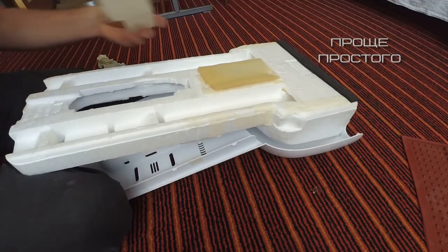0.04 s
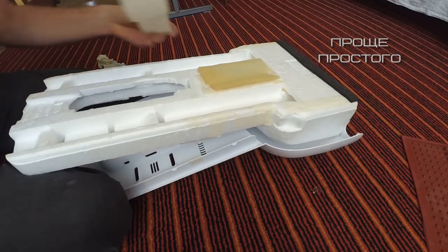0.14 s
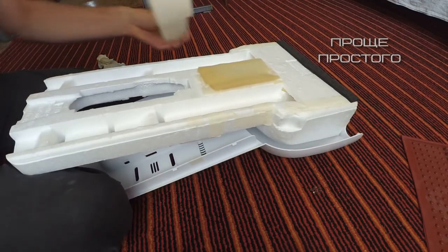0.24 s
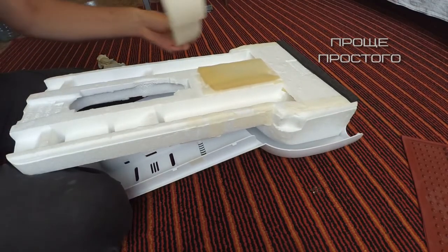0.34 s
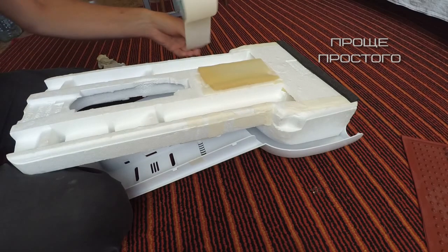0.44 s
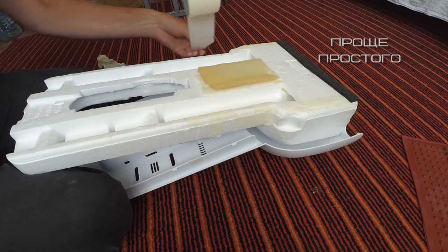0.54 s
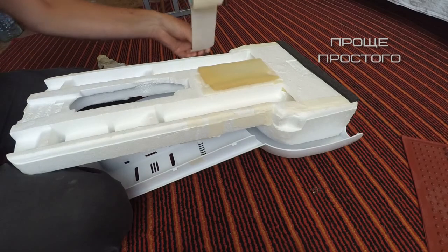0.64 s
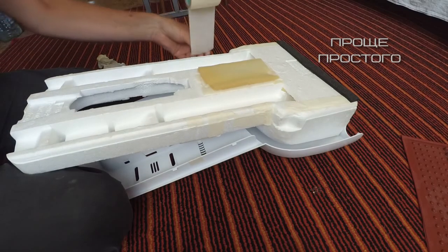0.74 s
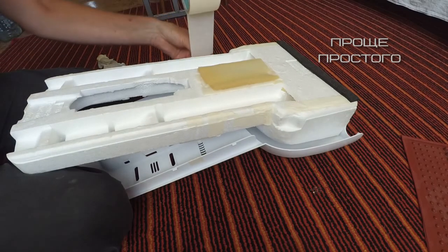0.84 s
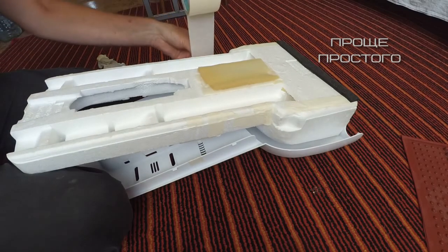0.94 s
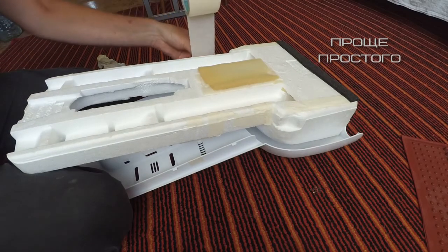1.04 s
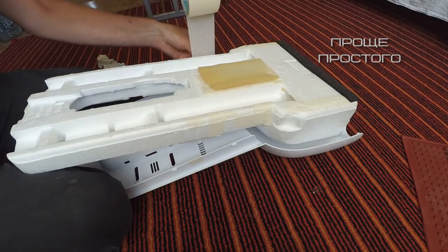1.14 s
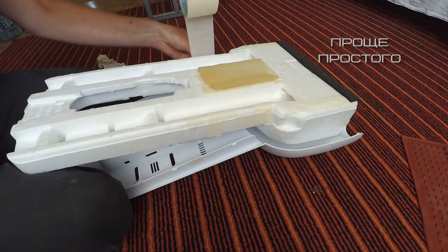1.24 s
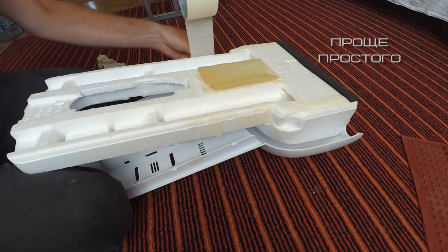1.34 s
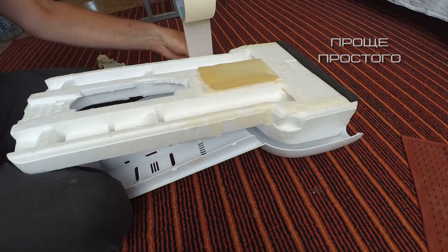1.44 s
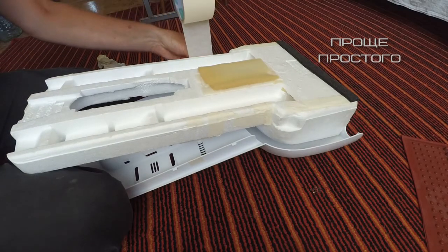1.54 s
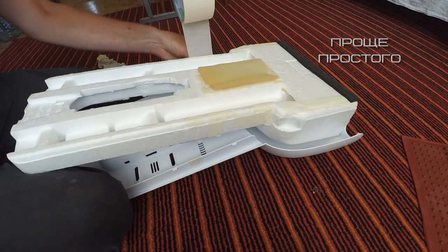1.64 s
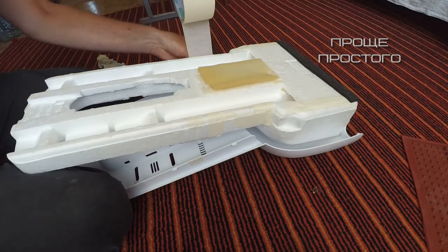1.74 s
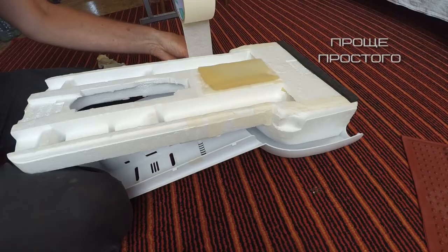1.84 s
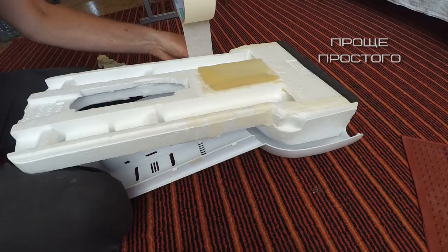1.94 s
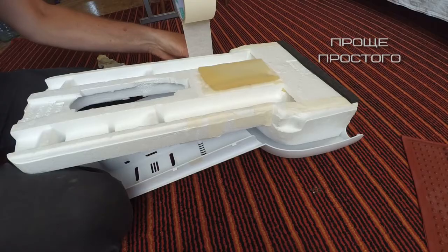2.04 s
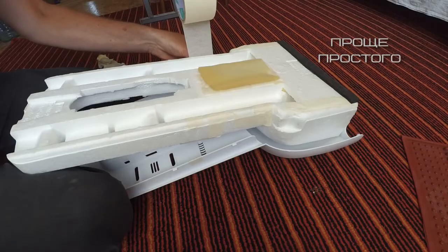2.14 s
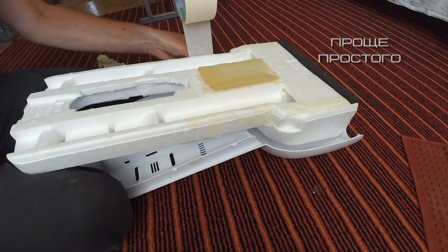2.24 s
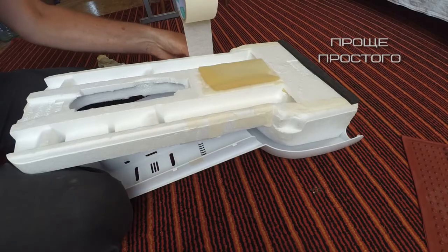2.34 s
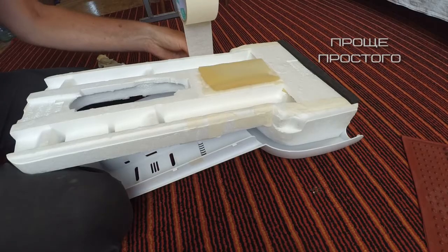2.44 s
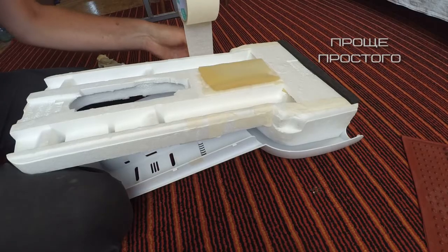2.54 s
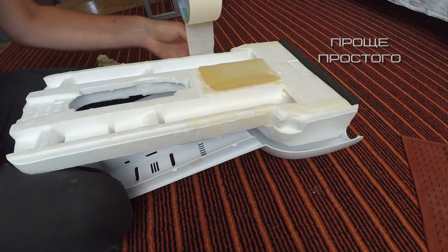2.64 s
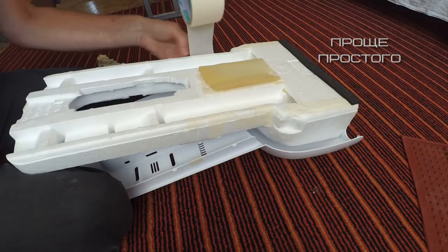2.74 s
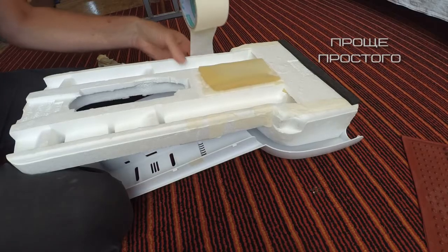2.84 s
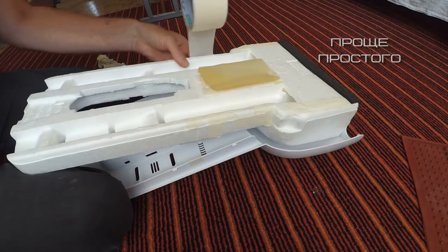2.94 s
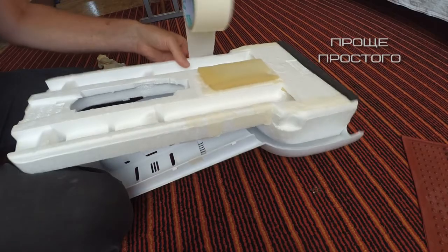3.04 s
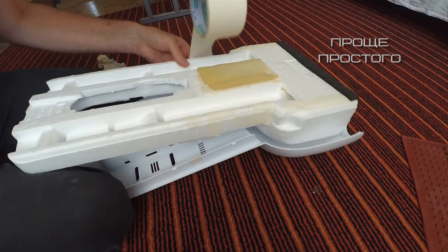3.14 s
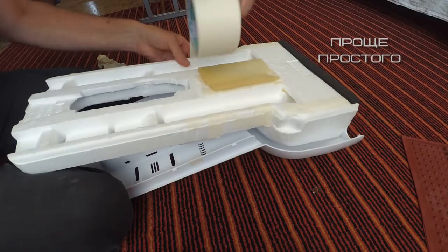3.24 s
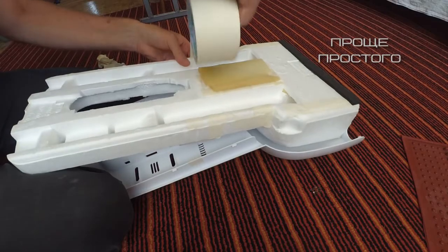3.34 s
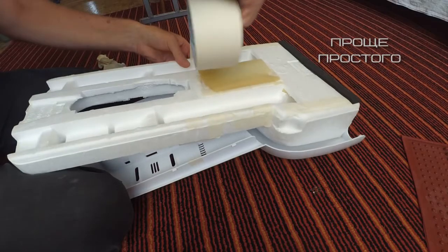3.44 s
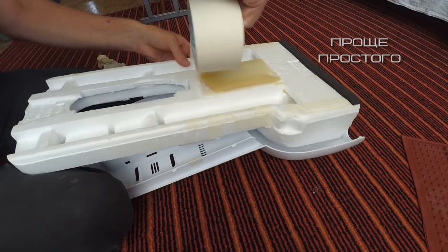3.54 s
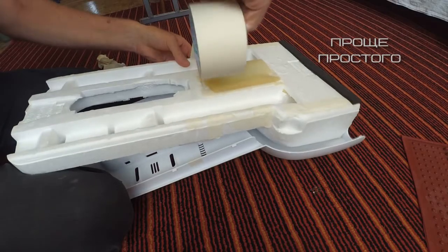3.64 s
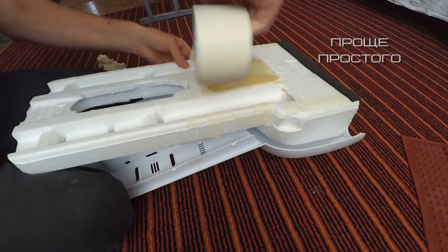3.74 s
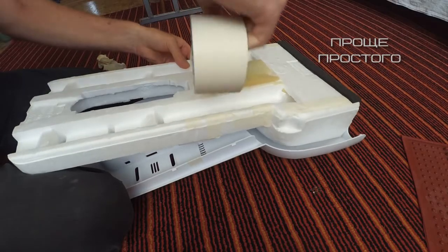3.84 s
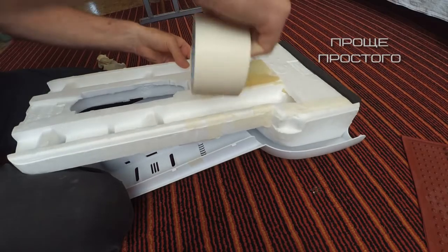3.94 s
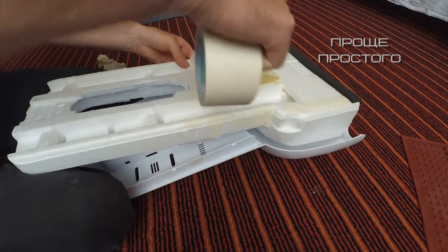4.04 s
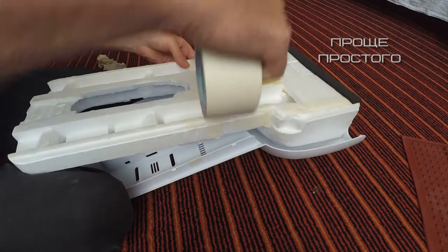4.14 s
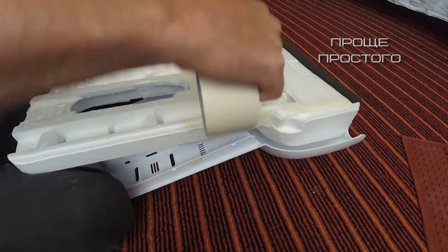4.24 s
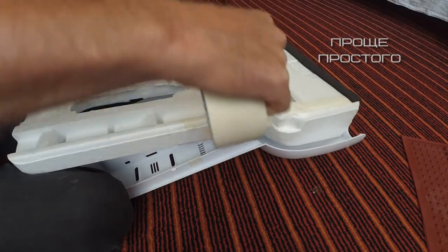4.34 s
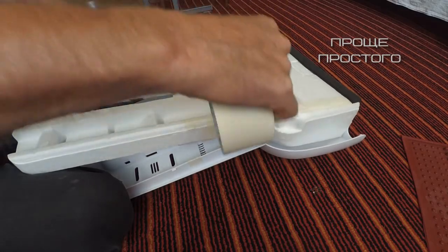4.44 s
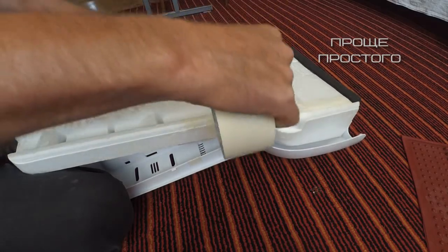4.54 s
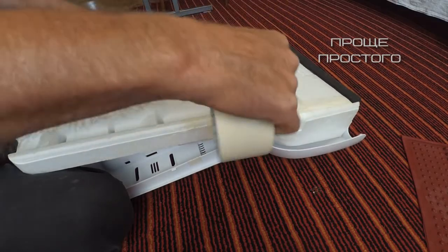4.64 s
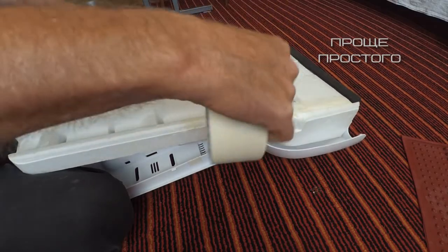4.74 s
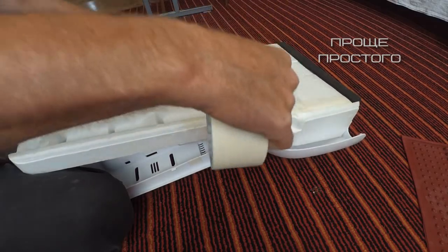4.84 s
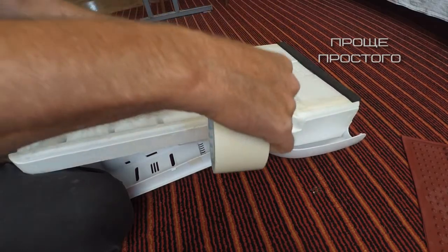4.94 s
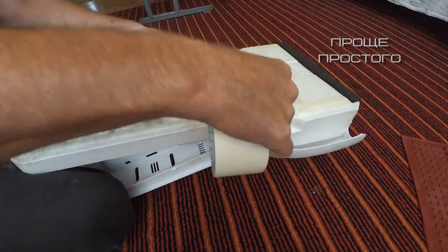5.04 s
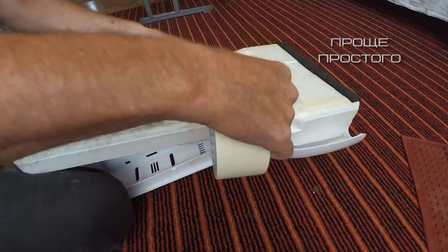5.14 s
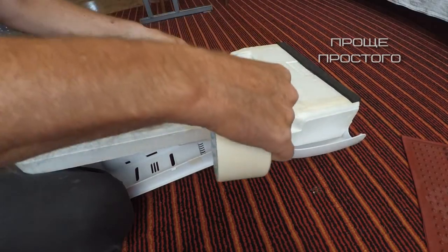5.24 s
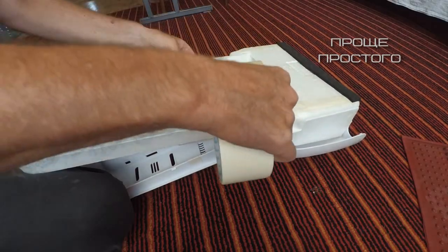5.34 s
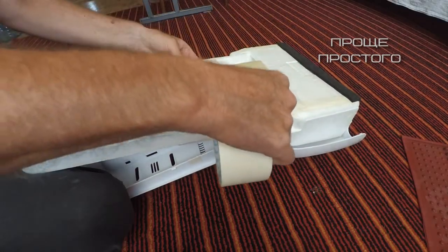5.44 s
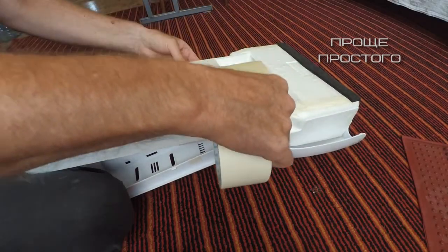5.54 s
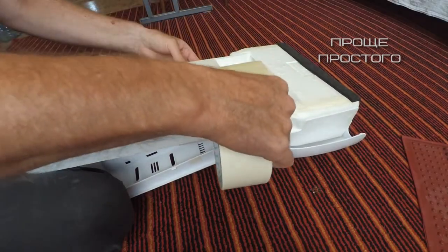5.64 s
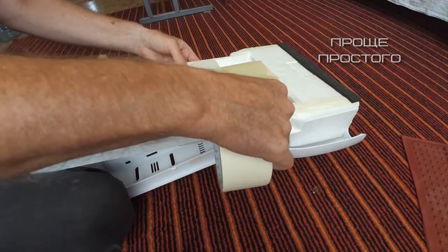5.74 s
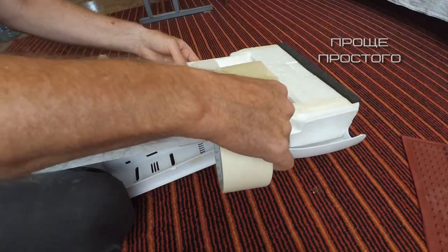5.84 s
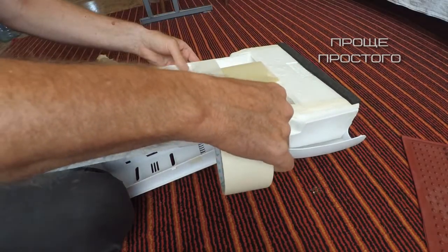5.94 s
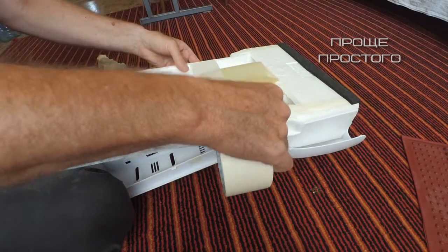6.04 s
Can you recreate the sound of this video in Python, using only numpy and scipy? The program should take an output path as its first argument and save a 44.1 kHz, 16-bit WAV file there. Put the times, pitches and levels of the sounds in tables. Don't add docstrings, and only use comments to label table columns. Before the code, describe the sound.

Close in a small carpeted room, fingers softly rub crepe paper tape over a faint low traffic rumble. After about three quiet seconds a sharp double snap bursts out, then four abrupt, loud rips of tape follow, each a stuttering crack ringing the hollow cardboard core, with dull panel knocks beneath. Fine crinkling follows and dies away.

```python
import sys
import numpy as np
from scipy import signal
from scipy.fft import rfft, irfft
from scipy.io import wavfile
from scipy.ndimage import uniform_filter1d

SR = 44100
rng = np.random.default_rng(int(sys.argv[2]) if len(sys.argv) > 2 else 0)


def materialize(psi):
    bounded = np.clip(np.atleast_2d(psi).T, -1, 1)
    quanta = np.round(bounded * 32767).astype(np.int16)
    wavfile.write(sys.argv[1], SR, quanta)


N = 268524

# pitch_hz, level_db (per Hz)
PAPER_TONE = [(880, -19.5), (1500, -4), (2470, -3), (2750, -2.5), (3650, 0), (3990, 0.5), (4890, 2.5),
              (9230, -8.5), (13900, -21.5), (15500, -23.5)]
# middle_s, length_s, rub_db, fizz_db (fine fizz above the rub)
FINGER_STROKES = [(0, 0.16, -45, 1), (.19, 0.094, -60, 7), (0.333, 0.17, -54.5, -1),
                  (0.51, 0.077, -63, 11.5), (.624, 0.064, -60.5, 2), (.862, 0.45, -78.5, 7.5),
                  (1.085, 0.046, -59, -1), (1.542, 0.033, -73, 4), (1.62, 0.12, -72, -7),
                  (1.75, 0.058, -61, -11), (2.018, 0.01, -41, -19), (2.096, 0.034, -62, -15),
                  (2.2, 0.13, -66, -3), (2.314, 0.074, -59, -18), (2.401, 0.13, -52, -10),
                  (2.549, .14, -50, 1.5), (2.716, .14, -51.5, -2.5), (2.88, 0.19, -54, 0.5),
                  (3.005, 0.091, -49, 1.5), (3.076, 0.11, -33.5, 0.5), (3.332, 0.16, -46.5, -2),
                  (3.39, 0.028, -37.5, 0.5), (3.44, 0.091, -37, 1), (3.648, 0.044, -39.5, -2),
                  (3.925, 0.048, -49.5, 1.5), (4.01, 0.13, -38, -3.5), (4.067, 0.12, -32, -8),
                  (4.265, 0.073, -41, -6), (4.53, 0.021, -41, -8), (4.61, 0.046, -42.5, -12)]
# time_s, contact_db, tension_db (pull on the core)
HAND_GRIP = [(0, -61, -5), (.7, -79, -1), (1.4, -82, 10.5), (2.0, -71.5, 10.5), (2.45, -75.5, 8.5),
             (2.9, -69, 0), (3.2, -60.5, 1.5), (3.55, -55, 2.5), (3.85, -48.5, 2.5), (4.2, -48.5, -0.5),
             (4.45, -49, -1), (4.8, -50.5, -17.5), (4.86, -55, -18.5), (5.3, -58.5, -14),
             (5.45, -60.5, -9.5), (5.97, -68.5, -12), (6.02, -73, -0.5)]
# time_s, band_spacing_hz, reflected_share (0-1)
NEAR_SURFACE = [(.27, 2600, .2), (.3, 2700, .62), (.4, 3050, .62), (.45, 3100, .15), (2.55, 2950, .27),
                (3.0, 2900, .25), (3.3, 2200, .25), (3.95, 2100, .25), (4.5, 1550, .23), (4.9, 1700, .22),
                (6.09, 1450, .18)]
# pitch_hz, level_db (per Hz)
RUMBLE_TONE = [(25, -33), (42, 0), (119, -3.5), (156, -14), (243, -15), (389, -18), (578, -12),
               (797, -17.5), (880, -14.5), (1440, -24), (2430, -32), (6850, -37), (14400, -51),
               (15500, -56)]
# time_s, nearness_db, tyre_whine_hz
PASSING_VEHICLE = [
    (0, -0.5, 673),
    (.6, -1.5, 665),
    (1.4, 0.3, 690),
    (1.5, -1, 585.5),
    (2.7, 2.5, 560.4),
    (3.2, 3, 550),
    (4.6, -2, 602.5),
    (6.09, -8, 620),
]
# pitch_hz, width_hz, level_db
DRONE = [(110, 14, -68), (195, 10, -71), (238, 10, -76), (820, 25, -74), (1030, 50, -73), (1420, 70, -80)]
# start_s, peak_db, pitch_hz
SINGLE_SNAPS = [(0.1855, -30, 3720), (0.4574, -48, 1750), (0.4978, -39.5, 6200), (0.598, -45.5, 2840),
                (0.9827, -44, 6600), (1.0784, -39, 3950), (2.0168, -34.5, 2130), (2.1869, -45.5, 4320),
                (2.3037, -43.5, 1840), (2.3865, -43, 2110), (2.5057, -45, 1940), (3.0969, -5, 6840),
                (3.099, -6.5, 6550), (3.1057, -15.5, 3520), (3.2042, -36.5, 5900), (3.2833, -35.5, 5370),
                (3.3895, -31, 3880), (3.6505, -26, 5560), (3.9121, -24.5, 4150), (3.9279, -31.5, 5510),
                (3.9716, -33.5, 2970), (4.4437, -32, 1500), (4.5074, -38.5, 3130), (4.531, -21, 2770),
                (4.604, -27, 3160), (4.6208, -31.5, 2680), (4.7269, -34.5, 3250), (4.7855, -30.5, 5030),
                (5.431, -40.5, 6470), (5.9217, -39, 4860)]
# first_s, last_s, snap_count, first_db, last_db
SNAP_FLURRIES = [
    (3.0521, 3.0915, 10, -25, -24),
    (4.45, 5.45, 85, -42, -47),
    (5.45, 5.98, 40, -52, -51),
]
# start_s, level_db, pitch_hz, fade_s (to -60 dB)
PANEL_THUMPS = [
    (0.617, -63, 200, 0.079),
    (2.022, -53, 197, 0.3),
    (3.102, -45.5, 127.7, 0.45),
    (3.473, -36, 195, .2),
    (3.69, -29.5, 172.4, 0.28),
    (4.04, -35.5, 196.6, .25),
    (4.292, -35.5, 120, 0.62),
]
# first_s, slip_count, gap_ms, first_ring_db, last_ring_db
SLIP_RUNS = [(3.3925, 1, 0, -27, -27), (3.4415, 1, 0, -26, -26), (3.447, 9, 3.3, -11, -1),
             (3.4792, 2, 3.2, -10, -9), (3.6797, 4, 6.3, -4, -1), (3.7014, 5, 3.1, -2, -2),
             (4.0009, 3, 3.8, -25, -20), (4.0366, 1, 0, -7, -7), (4.042, 2, 4.7, -1, -1),
             (4.0808, 2, 16.8, -9, -16), (4.2636, 1, 0, -27, -27), (4.2804, 1, 0, -3, -3),
             (4.3052, 3, 15.4, -2.5, -7)]
# pitch_hz, width_hz, level_db
CORE_RINGS = [(1342, 520, 6.5), (1010, 500, -1), (2690, 470, -4), (796.4, 330, -8), (620, 180, -13),
              (3900, 450, -7), (442, 110, -11.5), (200, 220, -18)]
# pitch_hz, level_db (per Hz)
GLUE_CRACK = [(1180, -23.5), (2000, -9), (2200, -10.5), (4110, -10.5), (5790, -11.5), (7880, -11),
              (13600, -22), (15500, -32.5)]
# pitch_hz, level_db
WALL_TONE = [(150, 10.5), (400, 9), (700, -1.5), (1200, -2), (1600, -5.5), (2200, 0.5), (4000, -4.5),
             (9000, -6), (15000, -5)]
# pitch_hz, fade_s (to -60 dB)
ROOM_FADE = [(150, 0.21), (400, 0.28), (1040, 0.24), (1450, 0.28), (2000, 0.29), (2760, 0.25), (7280, 0.23),
             (15000, 0.17)]
# delay_s, level_db
CLOSE_ECHOES = [(.0031, -12.5), (.0062, -19), (.0098, -18)]


def gain_of(db):
    return 10 ** (np.asarray(db) / 20)


def evened(x):
    return x / np.sqrt(np.mean(x ** 2) + 1e-20)


def read(points, hz):
    f, value = np.transpose(points)
    return np.interp(np.log(hz + 1), np.log(f + 1), value)


def add(mix, s, sound):
    part = mix[round(s * SR):][:len(sound)]
    part += sound[:len(part)]


def colour(x, db_of_hz):
    hz = np.fft.rfftfreq(len(x), 1 / SR)
    return irfft(rfft(x) * gain_of(db_of_hz(hz)), len(x))


def resonate(x, hz, width_hz):
    turn = np.exp(2j * np.pi * np.cumsum(hz * np.ones(len(x))) / SR)
    r = np.exp(-np.pi * width_hz / SR)
    return 2 * (turn * signal.lfilter([1 - r], [1, -r], x / turn)).real


def steep(x, hz, width_hz):
    return resonate(resonate(x, hz, width_hz), hz, width_hz)


def burst(noise, rise_s, fall_s):
    t = np.arange(len(noise)) / SR
    return noise * np.minimum(t / rise_s, 1) ** 2 * np.exp(-np.maximum(t - rise_s, 0) / fall_s)


def stroke_shape(t, middle_s, length_s, rub_db):
    side = np.where(t < middle_s, .7, 1.3)
    away = abs(2 * (t - middle_s) / length_s / side)
    return gain_of(rub_db - 23.5 * away ** 2.7)


def rubbing():
    t = np.arange(N) / SR
    clumps = gain_of(4 * np.clip(evened(uniform_filter1d(rng.standard_normal(N), 300)), -2, 1.5))
    grains = gain_of(6 * np.minimum(rng.exponential(1, N), 4))
    grains = grains * (rng.random(N) < 1300 * clumps / SR)
    drive = .75 * evened(uniform_filter1d(grains, 24) * rng.standard_normal(N))
    drive = drive + .66 * rng.standard_normal(N)
    body = evened(colour(drive, lambda hz: read(PAPER_TONE, hz) - 30 / (1 + (7000 / (hz + 1)) ** 8)))
    fizz = evened(colour(drive, lambda hz: read(PAPER_TONE, hz) - 30 / (1 + (hz / 6000) ** 8)))
    ring = evened(steep(drive, 1350, 1100))

    s, rest_db, pull_db = np.transpose(HAND_GRIP)
    waver = uniform_filter1d(uniform_filter1d(rng.standard_normal(N), size=900), size=900)
    rest = gain_of(np.interp(t, s, rest_db) + 2 * evened(waver))
    pull = gain_of(np.interp(t, s, pull_db))
    strokes = [stroke_shape(t, *row[:3]) for row in FINGER_STROKES]
    moved = sum(strokes)
    fine = gain_of(-3) * rest + sum(gain_of(row[3]) * e for row, e in zip(FINGER_STROKES, strokes))
    core = pull * (rest + gain_of(-9) * moved) * ring
    return gain_of(-5.0) * ((rest + moved) * body + fine * fizz + core)


def combed(x):
    n = np.arange(N)
    s, hz, share = np.transpose(NEAR_SURFACE)
    lag = SR / np.interp(n / SR, s, hz)
    share = np.clip(np.interp(n / SR, s, share), 0, .9)
    return sum(share ** k * np.interp(n - k * lag, n, x) for k in range(4)) * np.sqrt(1 - share ** 2)


def outdoors():
    t = np.arange(N) / SR
    noise = rng.standard_normal((4, N))
    s, *columns = np.transpose(PASSING_VEHICLE)
    near_db, whine_hz = (np.interp(t, s, c) for c in columns)
    bass_db = 0.3 - 0.6 * near_db
    whine_db = -72 + 1.2 * near_db
    whole = colour(noise[0], lambda hz: read(RUMBLE_TONE, hz))
    drone = sum(gain_of(db) * evened(steep(noise[1], hz, w)) for hz, w, db in DRONE)
    mid = gain_of(-58.5) * evened(whole) + drone
    middle_part = (gain_of(near_db) - 1) * resonate(mid, 770, 1000)
    bass_part = (gain_of(bass_db) - 1) * resonate(mid, 200, 200)
    mid = mid + middle_part + bass_part
    mid = mid + (gain_of(1.5 * near_db + 2.0) - 1) * steep(mid, 1800, 1200)
    mid = mid + gain_of(whine_db) * evened(steep(noise[1], whine_hz, 16))
    sway = colour(noise[3], lambda hz: np.interp(hz, [2, 6, 14, 22, 36, 60], [-30, 0, 0, -19, -22, -60]))
    deep_hz = np.log([19, 35, 80, 200, 600])
    deep = colour(noise[2], lambda hz: np.interp(np.log(hz + 1), deep_hz, [0, -22, -17, -36, -62]))
    sides = np.array([[1], [-1]])
    return mid + gain_of(-51) * evened(sway) + gain_of(-66) * evened(deep) * sides


def flurries():
    rows = []
    for first, last, count, first_db, last_db in SNAP_FLURRIES:
        chance = np.clip(rng.standard_normal((count, 3)).T, -2, 2)
        place = np.clip((np.arange(count) + chance[0] * count / 40) / (count - 1), 0, 1)
        start_s = first + place * (last - first)
        peak_db = first_db + place * (last_db - first_db) + 3 * chance[1]
        rows += zip(start_s, peak_db, 4400 * 2 ** (.6 * chance[2]))
    return rows


def snaps():
    out = np.zeros(N)
    rows = SINGLE_SNAPS + flurries()
    chance = rng.standard_normal((len(rows), 512))
    for (s, db, hz), noise in zip(rows, chance):
        tick = burst(evened(colour(noise, lambda f: read(PAPER_TONE, f))), .0004, .0009)
        knock = resonate(burst(noise[::-1], .0006, .002), 1100, 1200)
        tick = 0.36 * tick + 2.4 * resonate(tick, hz, 2100) + 0.81 * knock
        add(out, s, gain_of(db - 1.5) * tick / abs(tick).max())
    return out


def thumps():
    out = np.zeros(N)
    t = np.arange(SR // 2) / SR
    for s, db, hz, fade_s in PANEL_THUMPS:
        swell = 1 - np.exp(-t / 0.004)
        add(out, s, gain_of(db - 60 * t / fade_s) * swell * np.sin(2 * np.pi * hz * t))
    return out


def slips():
    rows = []
    for s, count, gap_ms, first_db, last_db in SLIP_RUNS:
        k = np.arange(count)
        chance = rng.standard_normal((count, 4)).T
        weak = (k % 2) * (gap_ms < 5)
        ring_db = np.linspace(first_db, last_db, count) - 3.5 * weak + 1.2 * chance[0]
        crack_db = -7 - 0.18 * gap_ms - 0.18 * ring_db + 3 * weak + 1.2 * chance[1]
        start_s = s + k * gap_ms / 1000 + .0003 * chance[2] * (k > 0)
        rows += zip(start_s, ring_db, crack_db, 1.03 + .055 * chance[3])
    return rows


def rips():
    out = np.zeros(N)
    t = np.arange(1024) / SR
    rows = slips()
    chance = rng.standard_normal((len(rows), 1024))
    for (s, db, crack_db, pitch), noise in zip(rows, chance):
        jolt = np.exp(-((t - .0018) / .00005) ** 2) + .1 * burst(noise, .002, .001)
        ring = sum(gain_of(d) * steep(jolt, hz * pitch, w) for hz, w, d in CORE_RINGS)
        crack = colour(noise[::-1], lambda hz: read(GLUE_CRACK, hz) - .0004 * hz)
        crack = burst(crack + 1.5 * resonate(crack, 4100, 900), .002, .0014)
        slip = ring / abs(ring).max() + gain_of(crack_db + 3.0) * crack / abs(crack).max()
        add(out, s - .0015, gain_of(db + 1.72) * slip)
    return out


def room(x):
    taps = np.zeros(SR // 2)
    at = np.arange(200, len(taps) - 12, 12) + rng.integers(0, 12, (len(taps) - 201) // 12)
    taps[at] = rng.choice([-1., 1.], at.shape)
    hz, t, z = signal.stft(taps, SR, nperseg=256)
    fade = gain_of(-60 * t / read(ROOM_FADE, hz)[:, None])
    tail = signal.istft(z * fade, SR, nperseg=256)[1]
    tail = gain_of(-4.0) * tail / np.linalg.norm(tail)
    for s, db in CLOSE_ECHOES:
        add(tail, s, gain_of([db]))
    return signal.fftconvolve(x, tail)[:N]


def high_pass(x, hz):
    return signal.sosfilt(signal.butter(2, hz, "high", fs=SR, output="sos"), x)


def scene():
    pulled = high_pass(rips(), 90) + combed(rubbing())
    creases = snaps()
    sent = pulled + gain_of(-5) * creases
    echoes = room(colour(sent, lambda hz: read(WALL_TONE, hz)))
    return pulled + creases + echoes + thumps() + outdoors()


def overload(x):
    x = high_pass(np.clip(x, -.93, .93) - x, 150) + x
    return np.clip(x, -.97, .97)


def roughen_treble(x):
    hz, t, z = signal.stft(x, SR, nperseg=1024, noverlap=512)
    level = np.sqrt(uniform_filter1d(abs(z) ** 2, 16, axis=1))
    top_db = 20 * np.log10(level[0, (hz > 3000) & (hz < 9000)].mean(0) + 1e-9)
    attack = top_db > np.roll(top_db, 2) + 7
    luck = np.repeat(rng.random((len(t), 2)), 2, axis=0)[:len(t)].T
    busy = (top_db > -84) & (luck[0] < .75)
    edge_hz = np.where(busy, 11700 + 3000 * (luck[1] - .5), SR)
    after = (np.roll(attack, 2) | np.roll(attack, 3)) & (luck[0] < .45) & (top_db < -48)
    edge_hz = np.where(after, 4800 + 7000 * luck[1], edge_hz)
    edge_hz = np.where(attack, SR, edge_hz)
    noise = level * (rng.standard_normal(z.shape) + 1j * rng.standard_normal(z.shape)) * 1.1
    z = np.where(hz[:, None] > edge_hz, noise, z)
    z = z * gain_of(-45 * (hz > 15600))[:, None]
    return signal.istft(z, SR, nperseg=1024, noverlap=512)[1][:, :N]


def band_limit(x):
    return signal.sosfilt(signal.butter(12, 15650, fs=SR, output="sos"), x)


def record(dry):
    mix = roughen_treble(overload(dry))
    return band_limit(mix)


dry = scene()
out = record(dry)
materialize(out)
```